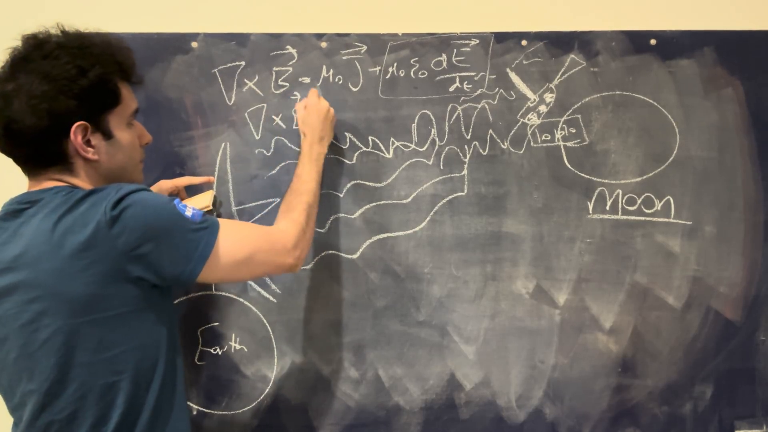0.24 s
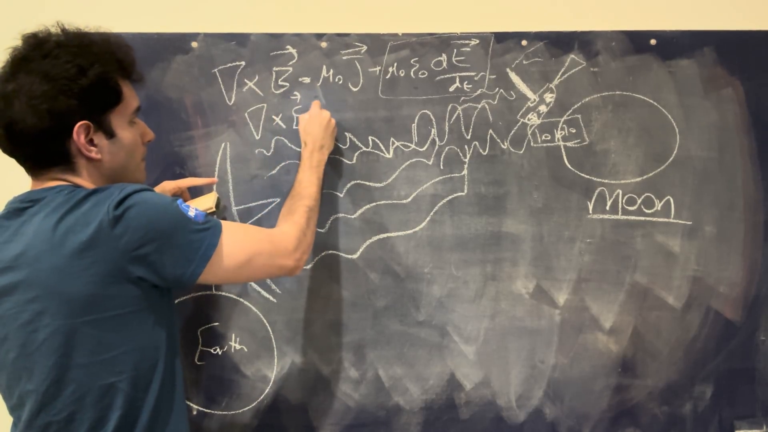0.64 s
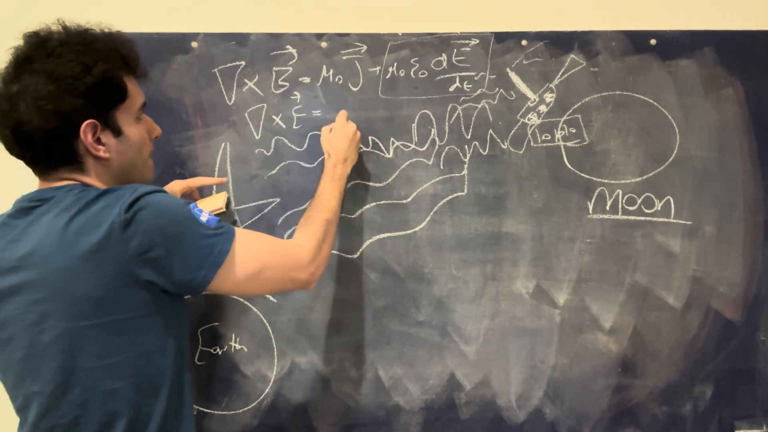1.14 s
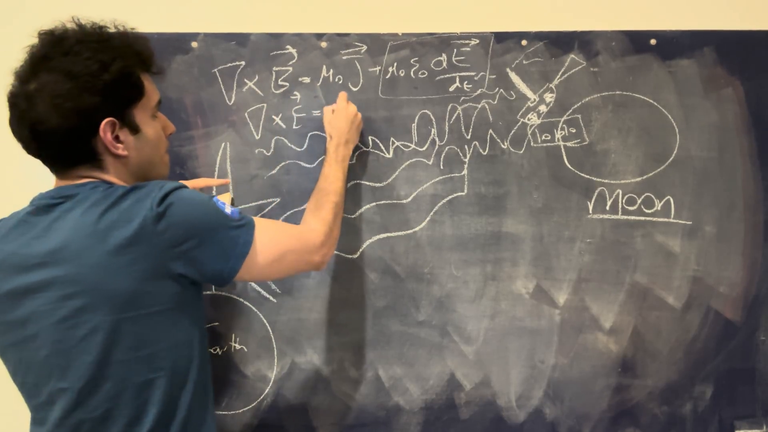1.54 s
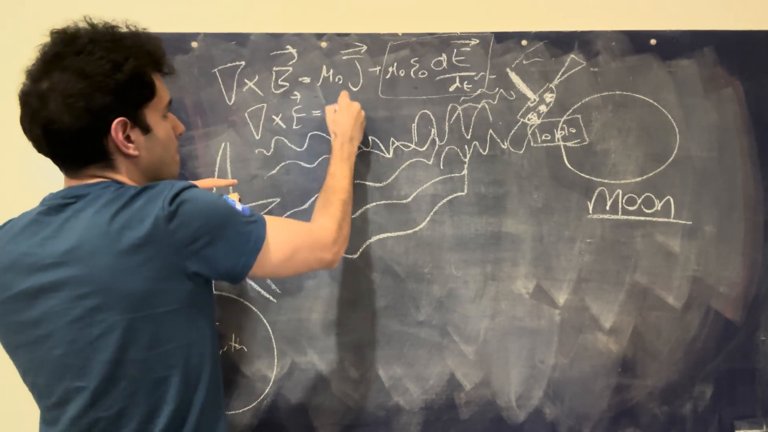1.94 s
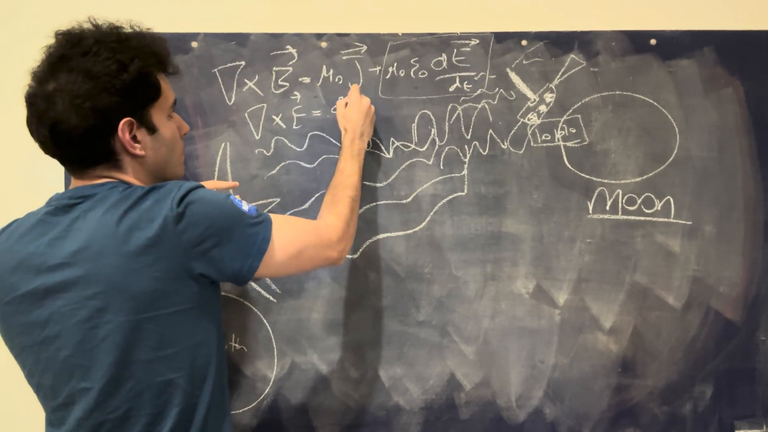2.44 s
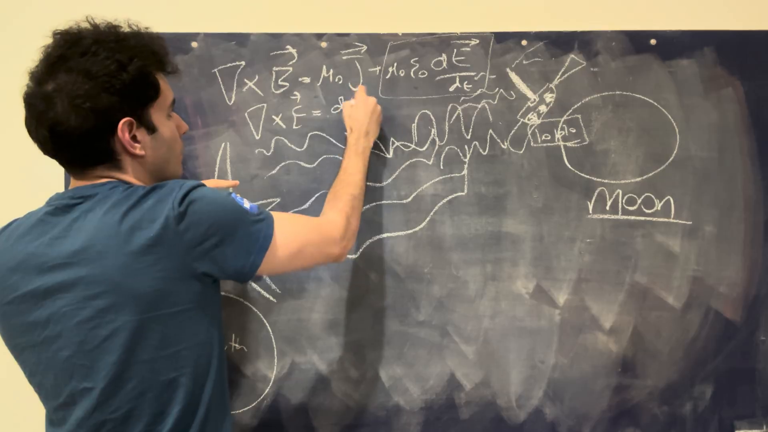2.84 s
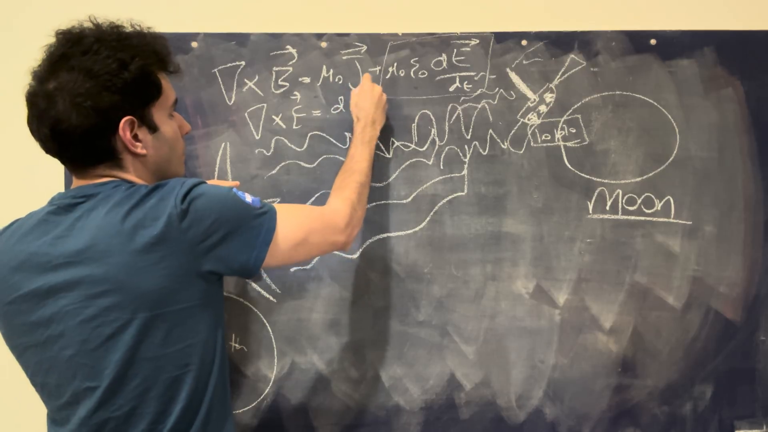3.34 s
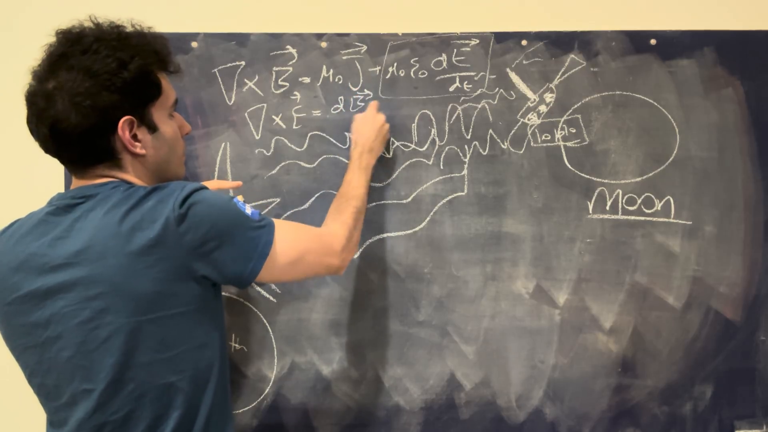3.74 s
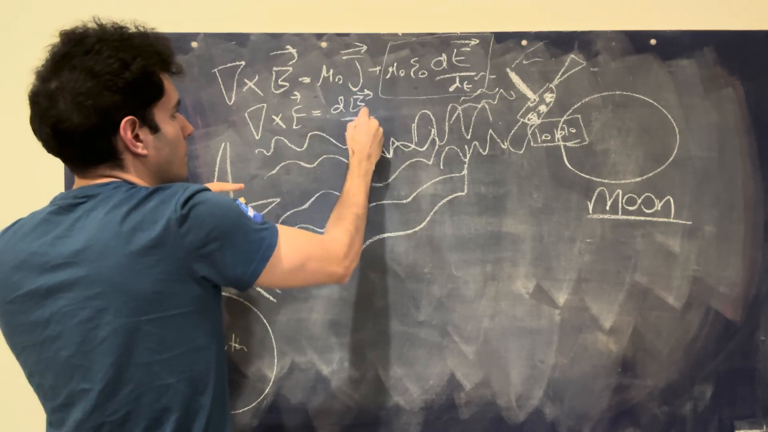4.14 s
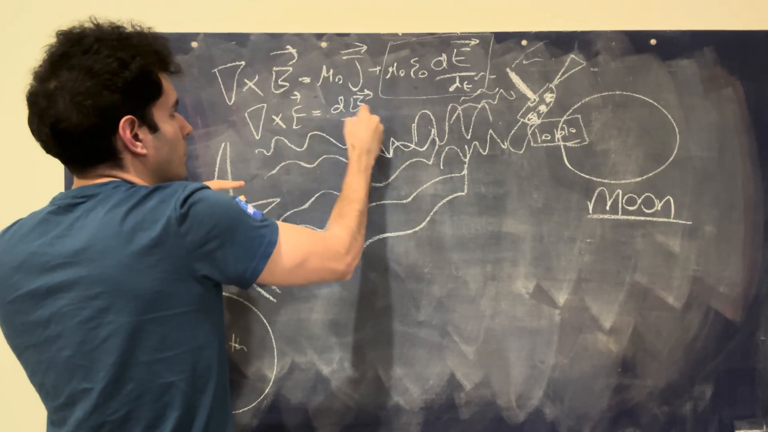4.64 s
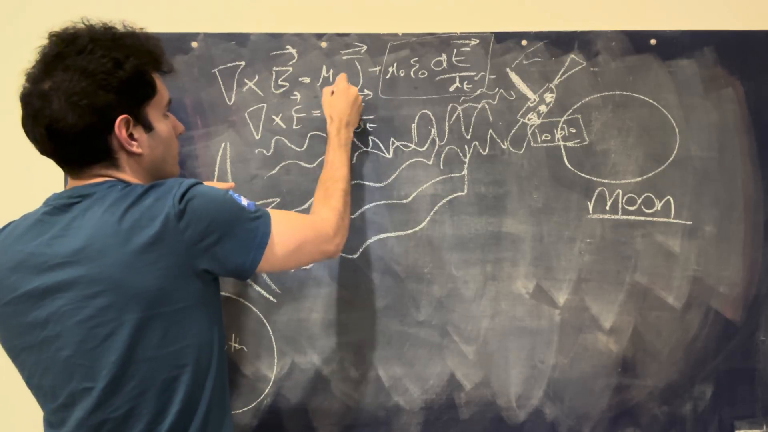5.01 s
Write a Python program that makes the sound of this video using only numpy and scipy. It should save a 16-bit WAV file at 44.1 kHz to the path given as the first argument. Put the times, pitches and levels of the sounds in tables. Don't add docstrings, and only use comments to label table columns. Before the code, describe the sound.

Chalk knocks woodily on a blackboard and drags in short hissing strokes, in irregular clusters with pauses, over faint room rumble.

```python
import sys
import numpy as np
from scipy import signal
from scipy.io import wavfile
from scipy.ndimage import uniform_filter1d

SR = 44100
rng = np.random.default_rng(int(sys.argv[2]) if len(sys.argv) > 2 else 0)


def store_pcm(level_fs):
    pcm = np.round(np.clip(level_fs, -1, 1) * 32767).astype(np.int16)
    wavfile.write(sys.argv[1], SR, np.atleast_2d(pcm).T)


def elevation(decibels):
    levels = np.asarray(decibels, float)
    return 10 ** (levels / 20)


N = 232362
LEAD = 4096
M = N + LEAD
TIME = (np.arange(M) - LEAD) / SR

# (f/Hz, level/dB, t60/s)
LOW_MODES = [(509, 6, 0.081), (600, 11.5, 0.045), (687.3, 5, 0.079), (742.8, 17, 0.032), (812, -9, 0.076),
             (941, 9, 0.054), (1045, 3.5, 0.088)]
HIGH_MODES = [(1116, 0, 0.11), (1365, 5, 0.022), (1552, 0.5, 0.044), (1758, 6, 0.024), (1864, 4, 0.021),
              (2033, 7.5, 0.026), (2310, 1, 0.12)]
TOP_MODES = [(2422, -2.5, 0.093), (2650, 3, 0.024), (3030, 3.5, 0.037), (3500, 1, 0.032), (4150, -3, 0.026),
             (4705, 1.5, 0.018), (6500, -22, 0.017)]
BAFFLE = signal.butter(4, 470, "high", fs=SR, output="sos")


def unit(x):
    return x / np.sqrt(np.mean(x ** 2))


def peaked(x, db):
    return x * elevation(db) / np.max(np.abs(x))


def band(x, hz, width):
    return signal.lfilter(*signal.iirpeak(min(hz, .45 * SR), hz / width, fs=SR), x)


def twice(x, hz, width):
    return band(band(x, hz, width), hz, width)


def ring(x, hz, t60):
    fade = np.exp(-np.log(1000) / (t60 * SR))
    turn = 2 * np.pi * hz / SR
    return signal.lfilter([0, np.sin(turn)], [1, -2 * fade * np.cos(turn), fade ** 2], x)


def walk(rate):
    hold = int(SR / rate)
    levels = np.repeat(rng.standard_normal(M // hold + 1), hold)
    return unit(uniform_filter1d(levels, hold)[:M])


def add(out, s, sound):
    i = int(s * SR) + LEAD
    out[i:i + len(sound)] += sound[:M - i]


def air():
    # (f/Hz, level/dB rms, start/turns)
    motors = [(52.97, -51, 0), (83.8, -66, 0), (117.44, -66, .68), (119.97, -60, 0), (176.2, -74, 0),
              (179.9, -76, .3)]
    # (f/Hz, width/Hz, level/dB)
    whistle = (7300, 1100, -95)
    # (t/s, level/dB)
    draught = [(0.0, -34.5), (0.4, -28.5), (0.7, -22.5), (0.92, -31.5), (1.36, -40.5), (1.69, -18),
               (1.83, -22.5), (1.98, -31.5), (2.86, -29), (2.96, -19), (3.2, -34.5), (3.46, -22),
               (3.83, -31), (3.98, -22), (4.26, -32), (4.83, -25), (5.0, -39), (5.27, -28.5)]
    hum = sum(np.sqrt(2) * elevation(g) * np.sin(2 * np.pi * (f * TIME + turn)) for f, g, turn in motors)
    swing = unit(twice(rng.standard_normal(M), 4.575, 5.66))
    whistle_hz, whistle_width, whistle_db = whistle
    grille = unit(twice(rng.standard_normal(M), whistle_hz, whistle_width)) * elevation(whistle_db)
    return hum + grille + swing * elevation(np.interp(TIME, *np.transpose(draught)))


def room(x):
    # (f/Hz, level/dB per Hz)
    vent_curve = [(20, -74.5), (40, -68), (65, -76), (100, -97.5), (160, -92), (280, -95), (400, -101.5),
                  (760, -100), (1000, -104), (1300, -106), (1700, -116), (2600, -119), (4500, -124),
                  (15500, -132)]
    # (f/Hz, t60/s, level/dB)
    tail = [(122, 0.78, -5.5), (223, 0.94, -12), (470, 0.16, -9), (740, 0.49, -16.5), (1440, 0.49, -16),
            (2560, 0.38, -13), (3460, 0.48, -11.5), (8000, 0.55, -27.5), (14000, 0.28, -22.5)]
    first_wall = 260
    late_db, late_stretch = -10, 2.35
    vent_hz, vent_db = np.transpose(vent_curve)
    tail_hz, t60, tail_db = np.transpose(tail)
    octaves = np.r_[np.arange(0, 4.3, 1 / 3), np.arange(26 / 6, 7, 1 / 6), np.arange(7, 9.7, 1 / 3)]
    out = 0
    for f, step in zip(20 * 2 ** octaves, np.gradient(octaves)):
        width = f * step
        noise = unit(twice(rng.standard_normal(M), f, width))
        vent_level = np.interp(np.log(f), np.log(vent_hz), vent_db) + 0.32 * walk(1.42)
        vent = 3 * width * elevation(vent_level) ** 2
        fed = np.roll(twice(x, f, width) ** 2, first_wall) * 100 / SR
        fall_db = -120 / (np.interp(np.log(f), np.log(tail_hz), t60) * SR)
        near = signal.lfilter([1], [1, -elevation(fall_db)], fed)
        late = signal.lfilter([1], [1, -elevation(fall_db / late_stretch)], fed)
        stored = near + elevation(2 * late_db) * late
        gain = elevation(2 * np.interp(np.log(f), np.log(tail_hz), tail_db))
        out = out + np.sqrt(vent + stored * gain) * noise
    return out


def pressure():
    # (t/s, time to full pressure/s, length/s, tip hiss level/dB, board rub over hiss/dB)
    drags = [(-.03, 0.097, .18, -61.5, 3), (0.471, 0.022, 0.068, -61, 14.5), (0.652, 0.044, 0.076, -63, 17),
             (1.135, .03, .06, -76.5, -3), (1.651, 0.016, 0.07, -59, 12.5),
             (1.726, 0.092, 0.16, -60.5, 11.5), (1.908, .07, 0.13, -60, 14),
             (2.665, 0.024, 0.087, -60.5, 17.5), (2.761, 0.066, 0.09, -57, 17),
             (2.871, 0.016, 0.047, -59.5, 11), (2.921, .028, .083, -64.5, 9), (3.027, 0.027, 0.074, -62, 8),
             (3.228, 0.037, 0.097, -64, 7), (3.415, .045, 0.085, -61, 1), (3.498, 0.031, 0.059, -64, 9),
             (3.562, .006, .02, -83, 8), (3.78, 0.059, 0.12, -55.5, 19), (4.014, .04, 0.11, -62.5, 5),
             (4.12, 0.054, 0.1, -58, 16), (4.237, 0.015, 0.098, -63.5, .2),
             (4.434, 0.027, 0.095, -63.5, -3), (4.506, 0.046, 0.034, -58, 2),
             (4.61, 0.067, 0.064, -58.5, 8)]
    lift_s = 0.017
    hiss_shape = [-9, 0, -5, -13]
    rub_shape = [-15, 0, -1.6, -1.6]
    s, rise, length, hiss, rub = np.transpose(drags)
    end = s + length
    when = np.maximum.accumulate(np.c_[s, s + rise, end - lift_s, end].ravel())
    hiss_db = np.interp(TIME, when, (hiss[:, None] + hiss_shape).ravel())
    rub_db = np.interp(TIME, when, (rub[:, None] + rub_shape).ravel())
    touch = sum(np.clip(np.minimum(TIME - a + 0.0046, b - TIME) / .0013, 0, 1) for a, b in zip(s, end))
    return hiss_db, rub_db, np.minimum(touch, 1)


def tip_hiss():
    # (f/Hz, width/Hz, level/dB)
    tip_modes = [(4640, 8600, -10), (9250, 4900, -6.5), (10320, 3800, -12), (11900, 3200, 0),
                 (13100, 1300, -7), (14500, 1600, -5), (15700, 990, 0)]
    bursts = np.minimum(rng.exponential(size=M // 24 + 1), 4.5).repeat(24)[:M]
    crumbs = rng.standard_normal(M) * elevation(2.0 * bursts)
    tip = sum(elevation(g + 1.5 * walk(30)) * twice(crumbs, f, 1.4 * w) for f, w, g in tip_modes)
    patches = sum(elevation(-1 + 3.5 * walk(14)) * band(tip, f, 110) for f in np.arange(8900, 15400, 650))
    return unit(tip + patches)


def board_rub(rub_db):
    # (t/s, f/Hz)
    path = [(0, 710), (.53, 750), (.72, 790), (1.66, 740), (1.82, 680), (1.98, 800), (2.7, 695),
            (2.83, 583), (2.99, 666), (3.055, 900), (3.3, 760), (3.45, 660), (3.58, 800), (3.86, 840),
            (4.06, 663), (4.19, 580), (4.3, 684), (4.64, 610)]
    hz = np.interp(TIME, *np.transpose(path))
    upper_db = -3 - 1.33 * rub_db
    drag = rng.standard_normal(M) * elevation(2.6 * walk(60))
    share = np.array([elevation(-30 * abs(np.log2(f / (.95 * hz)))) for f, g, d in LOW_MODES])
    share = share / np.linalg.norm(share, axis=0)
    low = sum(a * unit(ring(drag, f, d)) for a, (f, g, d) in zip(share, LOW_MODES))
    high = sum(elevation(-9.0 * np.log2(f / 1000)) * unit(ring(drag, f, d)) * np.sqrt(.03 / d)
               for f, g, d in HIGH_MODES + TOP_MODES)
    return unit(signal.sosfilt(BAFFLE, low)) + elevation(upper_db) * unit(high)


def strokes():
    hiss_db, rub_db, touch = pressure()
    hiss = elevation(1.3 * walk(90)) * tip_hiss()
    return touch * elevation(hiss_db) * (hiss + elevation(rub_db) * board_rub(rub_db))


def struck_board(t, hz, luck):
    # (f/Hz, level/dB, t60/s)
    deep_modes = [(93, 2.5, 0.071), (149.3, -6, 0.16), (210.1, -4.5, 0.26), (260.4, 5.5, 0.081),
                  (326, 1, 0.087)]
    upper_hz = 2.043 * hz
    push = np.exp(-t / .00006)
    swing = signal.sosfilt(BAFFLE, band(push, hz, 266))
    low = sum(elevation(g + 2.0 * r) * ring(swing, f * (1 + 0.024 * r), d)
              for (f, g, d), r in zip(LOW_MODES, luck))
    high, top, deep = np.zeros((3, len(t)))
    for k, ((f, g, d), r) in enumerate(zip(HIGH_MODES, luck[7:])):
        off_db = 30 * abs(np.log2(f / upper_hz))
        high += (-1) ** k * elevation(g + 1.5 * r - off_db) * ring(push, f, d)
    for k, ((f, g, d), r) in enumerate(zip(TOP_MODES, luck[14:])):
        top += (-1) ** k * elevation(g + 2.5 * r) * ring(push, f * (1 + .03 * r), d)
    for (f, g, d), r in zip(deep_modes, luck[5:]):
        arrival = 1 - np.exp(-(t * f) ** 2)
        deep += elevation(g + 4.44 * r) * ring(push, f * (1 + 0.051 * r), d) * arrival
    return low, high, top, deep


def chalk_click(t):
    # (f/Hz, width/Hz, level/dB)
    stick = [(5900, 4900, -6), (9880, 2800, 0.5), (11100, 1300, 1.5), (12080, 2400, -0.5),
             (14450, 1300, -5)]
    crumble = 0.28 * np.exp(-t / 0.0003) + 0.09 * np.exp(-t / 0.0017)
    crack = (t == 0) + rng.standard_normal(len(t)) * crumble
    return sum(elevation(g) * (-1) ** k * twice(crack, f, w) for k, (f, w, g) in enumerate(stick))


def taps():
    earlier = [
        (-.02, -17.5, 785, -17, -21),
    ]
    landings = [(0.397, -48, 770, -9, -19), (0.452, -19, 737, -6, -16), (0.642, -13, 721, -8, -9.5),
                (1.593, -15, 686, -16, -18), (2.629, -23, 620, -13, -20), (3.212, -10, 850, -12.5, -16.5),
                (3.386, -20.5, 780, -13, -13.5), (3.769, -14.5, 691, -3, -12),
                (4.011, -17.5, 620, -6.5, -13), (4.414, -18.5, 630, -13.5, -17),
                (4.591, -21, 630, -10.5, -21.5)]
    skips = [
        (1.2975, -61, 800, 2, -19),
        (1.970, -38, 734, -6.5, -25),
        (2.795, -34.5, 556, -28, -23),
        (3.032, -41, 910, -24, -26),
        (3.5442, -26.5, 960, -25, -10.5),
        (3.5484, -41.5, 880, -7, -3),
        (3.5536, -41, 955, -23, 1.5),
        (5.2645, -55, 664, -6, -17),
    ]
    out, t = np.zeros(M), np.arange(8192) / SR
    rows = list(earlier) + list(landings) + list(skips)
    spots = rng.standard_normal((len(rows), 3 * len(LOW_MODES)))
    for (s, db, hz, high_db, click_db), luck in zip(rows, spots):
        low, high, top, deep = struck_board(t, hz, luck)
        body = peaked(low, db) + peaked(high, db + high_db)
        body = body - band(body, 1081, 161)
        click = peaked(chalk_click(t), db + click_db)
        thud = peaked(deep, db - 22)
        add(out, s + 0.00025, body + click + thud + peaked(top, db - 22.5))
    return out


def ticks():
    # (t/s, peak level/dB, centre f/Hz)
    grit = [(.408, -66, 13000), (1.253, -61, 9000), (1.298, -59.5, 3000), (1.377, -58, 3000),
            (1.633, -75, 11000), (1.723, -46, 9000), (3.537, -50, 11000), (3.5465, -48, 11000),
            (3.557, -41, 11000), (1.970, -60, 8000), (1.981, -44, 10000), (2.399, -65, 3500),
            (2.456, -58, 3300), (2.483, -63, 3500), (2.828, -45, 10000), (2.833, -61, 11000),
            (3.054, -59, 11000), (3.310, -50, 9900), (4.162, -45, 9000), (4.532, -53, 9000),
            (4.921, -65, 5000), (4.331, -53, 9000), (4.67, -52, 9000)]
    out, t = np.zeros(M), np.arange(512) / SR
    for s, db, hz in grit:
        burst = rng.standard_normal(len(t)) * np.exp(-t / .0007)
        add(out, s - .0004, peaked(band(burst, hz, .6 * hz), db))
    return out


def scene():
    chalk = strokes() + taps() + ticks()
    return (chalk + room(chalk) + air())[None, LEAD:]


def top_cut(x):
    return signal.sosfilt(signal.butter(12, 16480, fs=SR, output="sos"), x)


def record(dry):
    top = signal.ellip(6, .5, 24, 15750, fs=SR, output="sos")
    return top_cut(signal.sosfilt(top, dry))


dry = scene()
out = record(dry)
store_pcm(out)
```